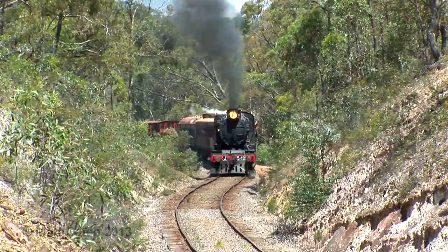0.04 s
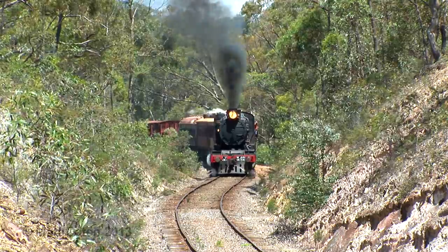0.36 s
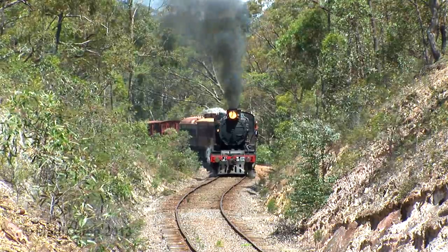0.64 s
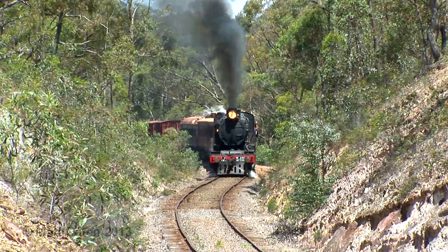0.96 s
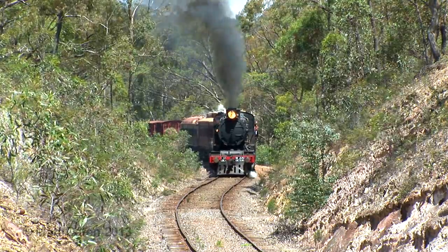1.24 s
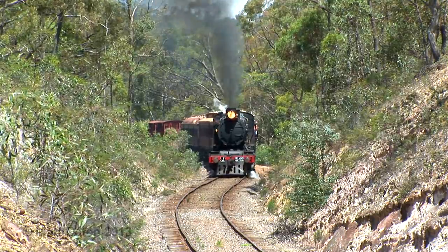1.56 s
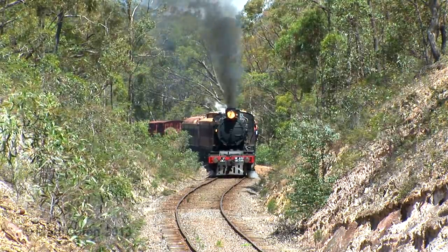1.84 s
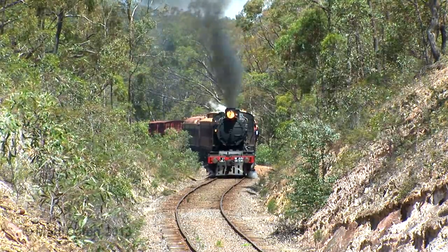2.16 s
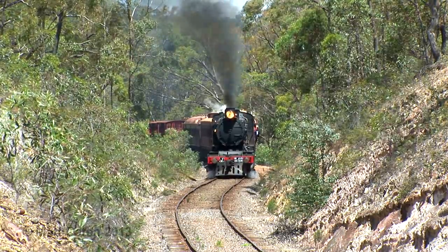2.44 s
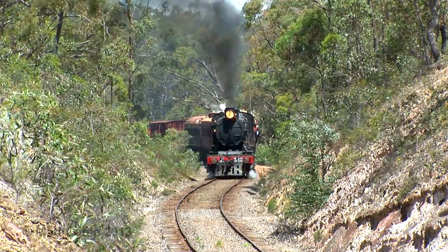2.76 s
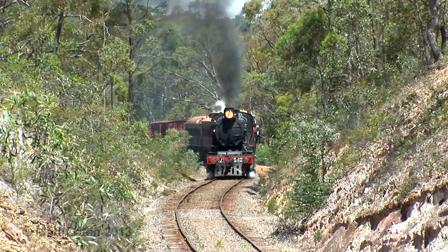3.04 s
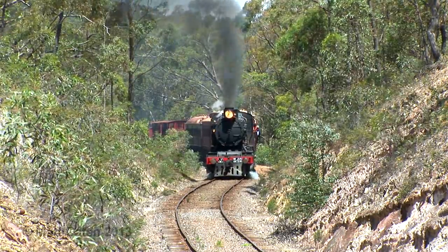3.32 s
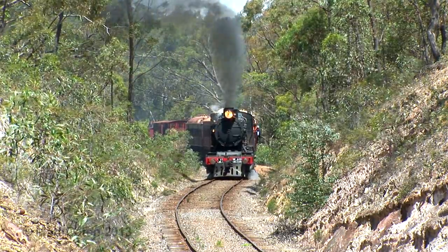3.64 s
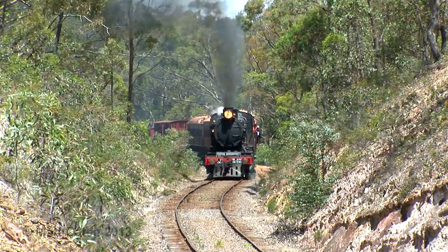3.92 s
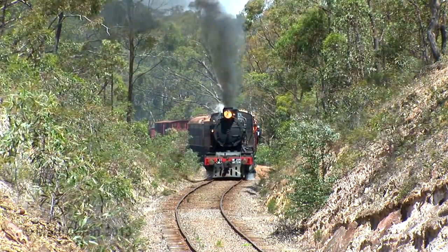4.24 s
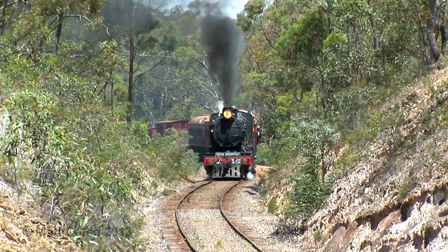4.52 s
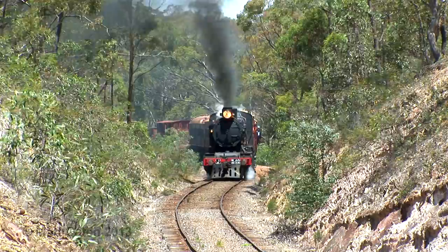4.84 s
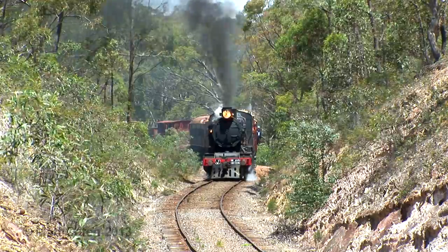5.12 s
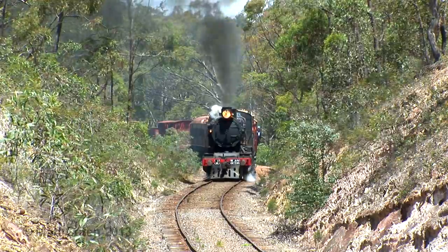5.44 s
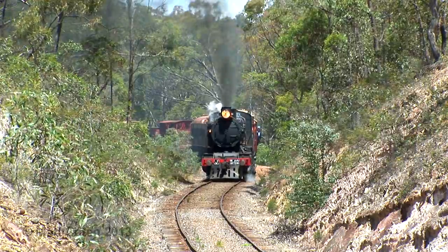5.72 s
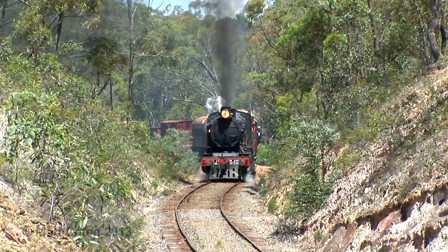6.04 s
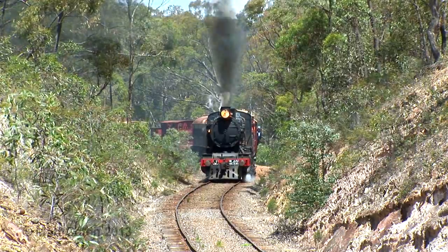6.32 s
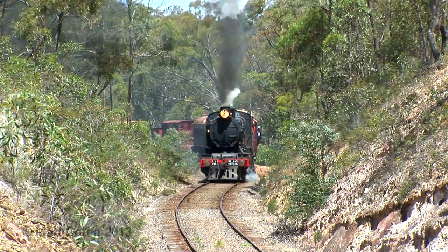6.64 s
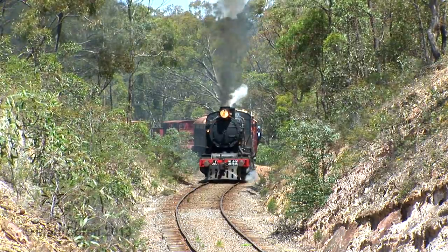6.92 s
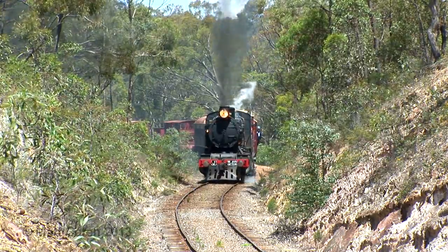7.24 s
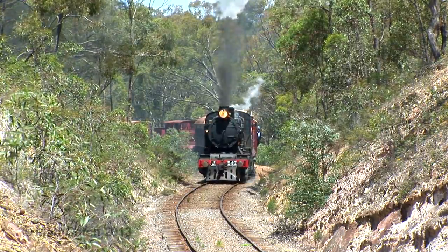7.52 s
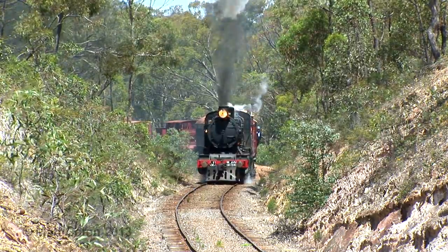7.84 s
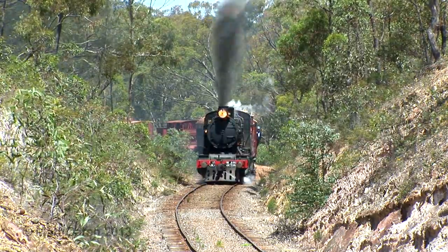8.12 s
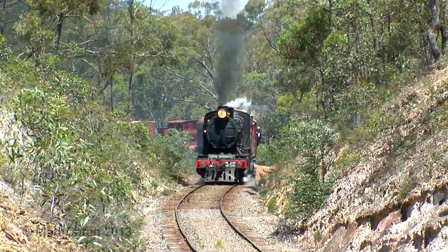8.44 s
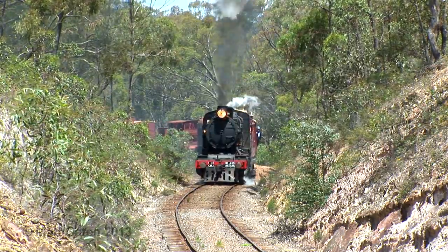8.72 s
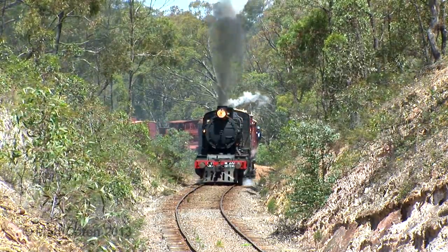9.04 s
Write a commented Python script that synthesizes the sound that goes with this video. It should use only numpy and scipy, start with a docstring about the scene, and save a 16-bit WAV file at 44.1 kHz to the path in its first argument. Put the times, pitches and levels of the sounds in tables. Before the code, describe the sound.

A steam locomotive works slowly uphill through a forest rock cutting, heard from some way ahead on the line. Evenly spaced exhaust chuffs, a little over two a second, each carry a deep thump and a low boom, and they soften in the second half. Steam hisses throughout over the train's rumble. A thin, high whistling squeal returns every fourth beat and grows stronger toward the end.

```python
"""A rock cutting in a forest: some way ahead, a two-cylinder steam locomotive labours slowly uphill.
Steam hisses all the while over the rumble of the train, and once a wheel turn a leaking gland
whistles thinly. Four exhaust beats a turn bark from the chimney, each a jet of steam with a deep thump
at its front and a low smokebox boom under it. The beats soften as the engine comes on; they bounce
off the ground, wash back from the trees and glance off the rock walls."""
import sys
import numpy as np
from scipy import signal
from scipy.fft import rfft, irfft, next_fast_len
from scipy.io import wavfile
from scipy.ndimage import uniform_filter1d

SR = 44100
rng = np.random.default_rng(int(sys.argv[2]) if len(sys.argv) > 2 else 0)


def generate_wav(signal):
    """Clip the signal to [-1, 1] and save it as 16-bit WAV at the path in sys.argv[1]."""
    frames = np.transpose(np.atleast_2d(signal))
    scaled = np.clip(frames, -1, 1) * 32767
    pcm = np.round(scaled).astype(np.int16)
    wavfile.write(sys.argv[1], SR, pcm)


N = 404397
TIME = np.arange(N) / SR

# exhaust beats: (time [s], release level [dB], peak level [dB], jet centre [Hz])
EXHAUST_BEATS = [(0.161, -15.5, -17, 2646), (0.665, -18, -16.5, 2130), (1.109, -17, -17, 2580),
                 (1.533, -18.5, -22, 2080), (2.004, -20.5, -19.5, 1750), (2.496, -21, -19, 2360),
                 (2.937, -18, -17, 2210), (3.352, -20.5, -19.5, 2310), (3.827, -16, -16, 2500),
                 (4.313, -18, -16, 1510), (4.748, -19.5, -14.5, 2070), (5.172, -23.5, -23.5, 1840),
                 (5.627, -25, -16, 2197), (6.109, -28, -17.5, 3400), (6.53, -33, -19, 2450),
                 (6.965, -26.5, -26, 2380), (7.419, -30.5, -23, 2650), (7.904, -29, -23.5, 2450),
                 (8.337, -29.5, -24, 2551), (8.753, -30.5, -26, 2330)]
# the four valve ports, one for each beat of a wheel turn:
# (time to peak [s], boom level [dB], low-mid shelf [dB], treble shelf [dB], jet centre boost [dB])
VALVE_PORTS = [(0.086, -33.5, -3, -5.8, 3.3), (0.085, -33, 0.2, -6, 2.7), (.097, -33, 2.5, -3.5, 7.5),
               (0.099, -36, 1, -4, 6)]
CLOSE_S, SOFT_CLOSE_S = .11, .018  # the valve closes this far into a hard beat; extra for a soft one


def from_db(db):
    """Decibels to gain."""
    return 10 ** (np.asarray(db) / 20)


def rms_one(x):
    """Scale to rms 1."""
    return x / np.sqrt(np.mean(x ** 2) + 1e-20)


def at_hz(points, hz):
    """Read an EQ curve on a log-frequency axis."""
    points_hz, points_db = np.transpose(points)
    return np.interp(np.log(hz + 0.00091), np.log(points_hz), points_db)


def bells(modes, hz):
    """Sum of bell-shaped peaks or notches, in dB."""
    return sum(db / (1 + (2 * (hz - centre) / width) ** 2) for centre, width, db in modes)


def equalise(x, db_at):
    """Filter by a curve of dB against Hz."""
    size = next_fast_len(len(x) + 8192)
    return irfft(rfft(x, size) * from_db(db_at(np.fft.rfftfreq(size, 1 / SR))), size)[:len(x)]


def noise(db_at, size=N):
    """Noise with the given spectrum; rms 1."""
    return rms_one(equalise(rng.standard_normal(size), db_at))


def drift(rate_hz):
    """Smooth random modulation that rolls off above rate_hz; rms about 1."""
    pole = np.exp(-32 * np.pi * rate_hz / SR)
    slow = signal.lfilter([1], [1, -2 * pole, pole * pole], rng.standard_normal(N // 16 + 4002))[4000:]
    return np.interp(np.arange(N) / 16, np.arange(len(slow)), rms_one(slow))


def low_pass(x, edge_hz):
    """Roll off the top without phase shift."""
    return signal.sosfiltfilt(signal.butter(2, edge_hz, fs=SR, output="sos"), x)


def wheel_turns():
    """Turns of the driving wheels, counted from the first beat."""
    beat_s = [s for s, *_ in EXHAUST_BEATS]
    return np.interp(TIME, beat_s, np.arange(len(beat_s)) / len(VALVE_PORTS))


def beats():
    """Each exhaust beat with its softness and its valve port."""
    # the bark softens as the engine comes on: (time [s], softness [about 0 hard to 1 soft])
    softness = [(0, -0.17), (2, -0.019), (4.3, 0.12), (5.5, 0.72), (6.5, 1.03), (7.5, 0.98), (9, 1.1)]
    for k, beat in enumerate(EXHAUST_BEATS):
        yield beat, np.interp(beat[0], *np.transpose(softness)), VALVE_PORTS[k % len(VALVE_PORTS)]


def steam_leak(sizzle_hz=5080, sizzle_width_hz=580, flicker_db=1.0):
    """The cylinders leak a rush and a hiss, a small gap sizzles; each swells once a wheel turn."""
    # flow of leaking steam: (time [s], level [dB])
    flow = [(0.0, -43), (0.71, -47.5), (1.48, -46.5), (1.68, -48.5), (2.5, -50.5), (2.71, -45),
            (3.4, -46.5), (4.06, -42.5), (5.31, -46), (6.15, -42.5), (7.97, -52), (8.1, -44.5),
            (8.43, -44.5), (9.17, -50.5)]
    # tone of the cylinder leak: (frequency [Hz], level [dB])
    steam_eq = [(200, -7.5), (550, -15), (780, -11.5), (1350, -9.5), (2200, 2), (2650, -0.5), (3100, -2),
                (3950, 0), (4400, -6.5), (5200, -7.5), (6300, -23.5), (7500, -28), (9500, -27),
                (12000, -34), (15000, -67)]
    flow_db = np.interp(TIME, *np.transpose(flow))
    flow_db -= flow_db.mean()
    steam = noise(lambda hz: at_hz(steam_eq, hz))
    rush = low_pass(steam, edge_hz=2720)
    # the gap resonates broadly, with steep skirts
    sizzle = noise(lambda hz: -40 * np.log10(1 + ((hz - sizzle_hz) / sizzle_width_hz) ** 2))
    # (sound, level at mean flow [dB], flow tracking [ratio], piston swing [dB], loudest at [turns])
    layers = [(rush, -45.5, .33, 1.15, .7), (steam - rush, -46, .9, .4, .9), (sizzle, -56, -.6, 3.5, .8)]
    out = np.zeros(N)
    for layer, db, tracking, swing_db, loudest in layers:
        piston_db = swing_db * np.cos(2 * np.pi * (wheel_turns() - loudest))
        out += rms_one(layer) * from_db(db + tracking * flow_db + piston_db + flicker_db * drift(16))
    return out


def rail_rumble(level_db=-49, sway_db=4.0):
    """The train rolls heavily on the rails: a swaying bed of low end."""
    # weight of the rolling train: (frequency [Hz], level [dB])
    rumble_eq = [(15, -5), (28, 5.5), (45, 4.5), (72, 2.5), (100, 0.5), (160, -9.5), (240, -36),
                 (500, -42.5)]
    return from_db(level_db + sway_db * drift(5.7)) * noise(lambda hz: at_hz(rumble_eq, hz))


def gland_whistle(waver=.002, rasp=.003, flicker_db=2.8, fifth_db=-16, octave_loss_db=-8, fade_s=.015):
    """A thin edge tone sweeps up, settles, holds and sags; under full pressure its period doubles."""
    # one whistle's pitch and level, boosted where it sweeps through the treble dip:
    # (stroke time [s], pitch [Hz], level [dB])
    stroke = [(-.11, 2900, -8), (-.04, 3450, 5), (-.02, 4500, 9), (0, 5520, 1), (.15, 5640, -4),
              (.41, 5820, 1), (.63, 5715, -3), (.71, 5400, 5), (.8, 5140, 9), (.88, 4050, -3)]
    # whistles: (time [s], stroke stretch [ratio], tone [dB], sub-octave [dB], octave [dB])
    whistles = [(-.15, 1.02, -58, -47, -74), (1.675, 1.04, -58, -48.5, -73), (3.51, 1.01, -58.5, -53, -73),
                (5.325, 1.0, -53, -41, -62), (7.115, 1.0, -51.5, -43.5, -63), (8.903, .95, -43, -46, -60)]
    # period doubling in stroke time: (starts [s], full [s], begins to fade [s], gone [s])
    doubling_s = (.122, .137, .6, .83)
    settle_hz, settle_rate_hz, settle_s, doubling_drop_hz = 70, 18, .12, 75
    wobble = 1 + waver * drift(37) + rasp * drift(300)
    orders = np.array([[1], [2], [1 / 2], [3 / 2]])
    # moving air makes each partial fade in and out on its own
    fading = from_db(flicker_db * np.array([drift(12) for _ in orders]))
    stroke_s, stroke_hz, stroke_db = np.transpose(stroke)
    out = np.zeros(N)
    for s, stretch, tone_db, sub_db, octave_db in whistles:
        span = (TIME > s + stretch * stroke_s[0]) & (TIME < s + stretch * stroke_s[-1])
        age = (TIME[span] - s) / stretch
        doubled = np.interp(age, doubling_s, [0, 1, 1, 0])
        # the pitch overshoots after the upward sweep and rings out
        settling = (age > 0) * np.sin(2 * np.pi * settle_rate_hz * age) * np.exp(-age / settle_s)
        hz = np.interp(age, stroke_s, stroke_hz) + settle_hz * settling - doubling_drop_hz * doubled
        phase = 2 * np.pi * np.cumsum(hz * wobble[span]) / SR
        # doubling thins the octave and brings in a sub-octave and a fifth
        gains = np.array([from_db(tone_db + np.interp(age, stroke_s, stroke_db)),
                          from_db(octave_db + octave_loss_db * (age > doubling_s[0])),
                          doubled * from_db(sub_db),
                          doubled * from_db(tone_db + fifth_db)])
        fades = np.clip(np.minimum(age - stroke_s[0], stroke_s[-1] - age) / fade_s, 0, 1)
        partials = gains * fading[:, span] * np.sin(orders * phase)
        out[span] += np.sqrt(2) * fades * partials.sum(axis=0)
    return out


def pressure_front(height=0.025, lag_s=0.0026, width_s=0.0058):
    """The first slug of steam leaves the chimney as one soft, deep thump just ahead of each bark."""
    out = np.zeros(N)
    for s, *_ in EXHAUST_BEATS:
        span = slice(int((s - .03) * SR), int((s + .04) * SR))
        out[span] -= height * np.exp(-((TIME[span] - s - lag_s) / width_s) ** 2)
    return signal.sosfilt(signal.butter(1, 25, "high", fs=SR, output="sos"), out)


def jet_spectrum(hz, low_db, treble_db, centre_hz, centre_db, width_hz=350):
    """The jet roars around a centre set by its speed, through the resonances of the chimney."""
    # tone of the exhaust jet: (frequency [Hz], level [dB])
    jet_eq = [(200, -27.5), (300, -21.5), (560, -20.5), (780, -13.5), (1300, -10.5), (1650, -5), (2080, -3),
              (2600, -3.5), (3150, -4.5), (3900, -2.5), (5200, -11.5), (6300, -33), (9000, -35.5),
              (15000, -53.5)]
    # chimney and smokebox resonances: (frequency [Hz], width [Hz], boost [dB])
    chimney_modes = [(371, 58, 7), (491, 23, 8), (734, 16, 3), (976, 47, 2.5), (1285, 23, 4),
                     (2075, 88, 6.5)]
    low_shelf = low_db * np.interp(hz, [1000, 1800], [1, 0])
    high_shelf = treble_db * np.interp(hz, [2800, 3800], [0, 1])
    roar = centre_db * np.exp(-((hz - centre_hz) / width_hz) ** 2)
    return at_hz(jet_eq, hz) + bells(chimney_modes, hz) + low_shelf + high_shelf + roar


def chimney_bark(gain_db=-1.0, crack_s=0.02, fall_db_per_s=210, flutter_db=1.17, grit_db=0.12):
    """The valve cracks open, the jet swells in the chimney, then dies; turbulence makes it flutter."""
    turbulence = rms_one(from_db(flutter_db * drift(49) - grit_db * drift(250)))
    out = np.zeros(N)
    for (s, release_db, peak_db, centre_hz), soft, port in beats():
        hard_peak_s, _, low_db, treble_db, centre_db = port
        start = int((s - .02) * SR)
        span = slice(start, start + SR // 3)
        age = TIME[span] - s
        # a soft beat has a broader tone, peaks sooner and closes later
        colour = low_db + 4.5 * soft, treble_db + 4.5 * soft, centre_hz, centre_db + 1.5 * soft
        peak_s, close_s = hard_peak_s - .031 * soft, CLOSE_S + SOFT_CLOSE_S * soft
        jet = noise(lambda hz: jet_spectrum(hz, *colour), size=len(age))
        envelope_db = np.interp(age, [-.012, 0, crack_s, peak_s, close_s],
                                [release_db - 60, release_db - 17, release_db, peak_db, peak_db - 6.5])
        envelope_db -= fall_db_per_s * np.maximum(age - close_s, 0)
        # the jet brightens as it gathers speed
        body = low_pass(jet, edge_hz=2900)
        bright_db = np.interp(age, [0, peak_s], [-5, .8])
        out[span] += from_db(envelope_db) * (body + from_db(bright_db) * (jet - body))
    return from_db(gain_db) * out * turbulence


def ground_bounce(x, delay_s=0.002638, far_db=-20, near_db=-8, dull_hz=2000):
    """A ground reflection hollows the bark, more strongly as the engine enters the cutting."""
    echo = np.interp(TIME - delay_s, TIME, low_pass(x, dull_hz))
    return x + from_db(np.linspace(far_db, near_db, N)) * echo


def smokebox_boom(gain_db=1.5, swell_s=0.039, fall_db_per_s=120, steadiness=0.21):
    """Each slug of steam shakes the smokebox; the boom swells after the crack and outlasts the bark."""
    # body of the smokebox: (frequency [Hz], level [dB])
    boom_eq = [(18, -23), (30, -4.5), (70, -2), (115, -3), (155, 2), (195, -2.5), (230, -16), (300, -36),
               (600, -69)]
    air = noise(lambda hz: at_hz(boom_eq, hz))
    # gentle compression: a slug of fixed size gives much the same push every time
    power = uniform_filter1d(air ** 2, size=2600)
    air = rms_one(air / (power + 1e-6) ** (steadiness / 2))
    push = np.zeros(N)
    for (s, *_), soft, (_, boom_db, *_) in beats():
        span = slice(int((s - .03) * SR), int((s + .6) * SR))
        age = TIME[span] - s
        close_s = CLOSE_S + SOFT_CLOSE_S * soft
        attack_db = np.interp(age, [-.025, .012, swell_s], [-35, -9, 0])
        decay_db = fall_db_per_s * np.maximum(age - close_s, 0)
        push[span] += from_db(boom_db + attack_db - decay_db)
    return from_db(gain_db) * push * air


def forest_wash(x, wet_db=-16.5, t60_s=1.0, bloom_s=.035, dull_hz=4000):
    """Trunks and rock faces scatter the sound back as a soft, duller wash."""
    age = TIME[:SR]
    bloom = 1 - np.exp(-(age / bloom_s) ** 2)
    tail = rng.standard_normal(SR) * from_db(-60 * age / t60_s) * bloom
    tail = low_pass(tail / np.sqrt(np.sum(tail ** 2)), dull_hz)
    return from_db(wet_db) * signal.fftconvolve(x, tail)[:N]


def cutting_walls(mid, decay_s=0.016, width_db=0.5):
    """Sound glances off the rough walls, smeared in time; an EQ shapes it into the side signal."""
    # stereo width: (frequency [Hz], side relative to mid [dB])
    width_eq = [(30, -18.5), (110, -30), (180, -31.5), (300, -14), (800, -10.5), (1500, -12), (2100, -20.5),
                (2600, -26), (3300, -25.5), (4000, -18.5), (5200, -12), (6300, 4.5), (8500, -5.5),
                (11000, -24)]
    scatter = rfft(rng.standard_normal(4096) * np.exp(-TIME[:4096] / decay_s))
    all_pass = irfft(scatter / np.abs(scatter))
    glancing = signal.fftconvolve(mid, all_pass)[:N]
    return equalise(glancing, lambda hz: at_hz(width_eq, hz) + width_db)


def scene(whistle_send_db=-9):
    """The engine is dead ahead; only the sound off the cutting walls differs between the ears."""
    exhaust = ground_bounce(chimney_bark()) + smokebox_boom() + pressure_front()
    whistle = gland_whistle()
    wash = forest_wash(exhaust + from_db(whistle_send_db) * whistle)
    mid = exhaust + whistle + wash + steam_leak() + rail_rumble()
    side = cutting_walls(mid)
    return np.array([mid + side, mid - side])


def record(dry, balance_db=-0.25, hiss_db=-70, cutoff_hz=15000):
    """Narrow dips hollow the treble of the centre sound; a faint hiss is added and the top is cut."""
    # narrow dips in the treble: (frequency [Hz], width [Hz], gain [dB])
    treble_notches = [(4680, 380, -14), (7780, 500, -6), (10700, 700, -3)]
    mid = equalise((dry[0] + dry[1]) / 2, lambda hz: bells(treble_notches, hz))
    side = (dry[0] - dry[1]) / 2
    pair = np.array([(mid + side) * from_db(balance_db / 2), (mid - side) * from_db(-balance_db / 2)])
    pair += from_db(hiss_db) * rng.standard_normal((2, N))  # even hiss, different in each ear
    return signal.sosfilt(signal.ellip(10, .1, 80, cutoff_hz, fs=SR, output="sos"), pair)


dry = scene()
out = record(dry)
generate_wav(out)
```